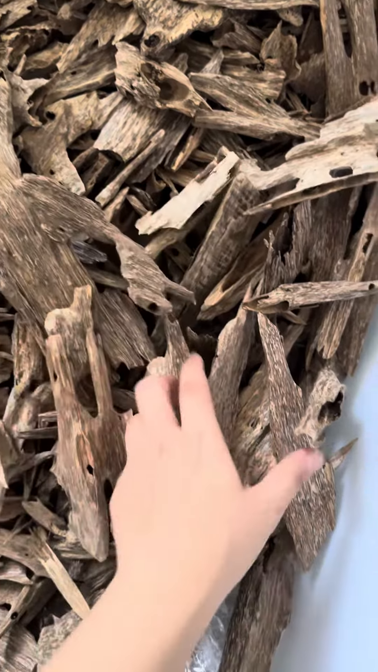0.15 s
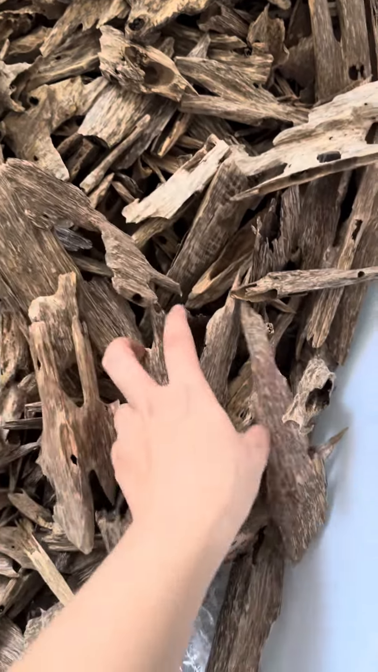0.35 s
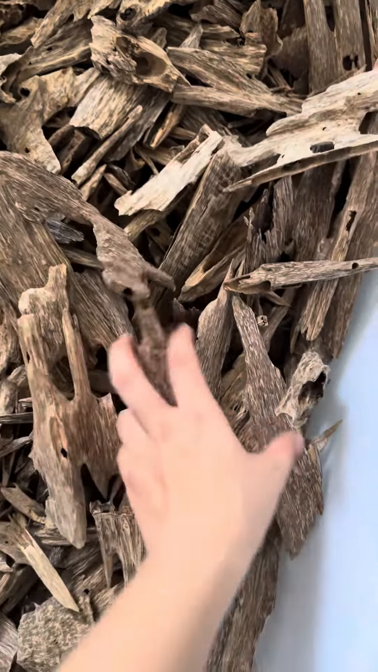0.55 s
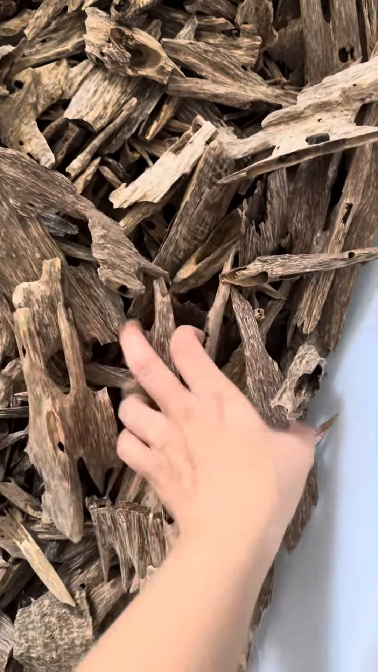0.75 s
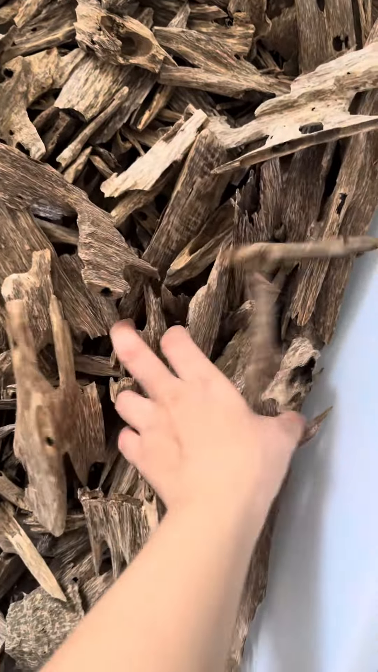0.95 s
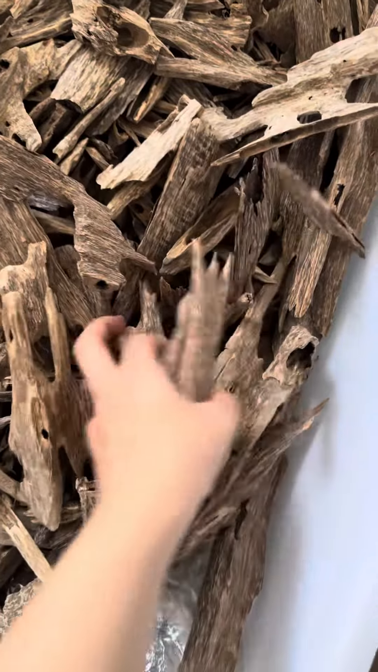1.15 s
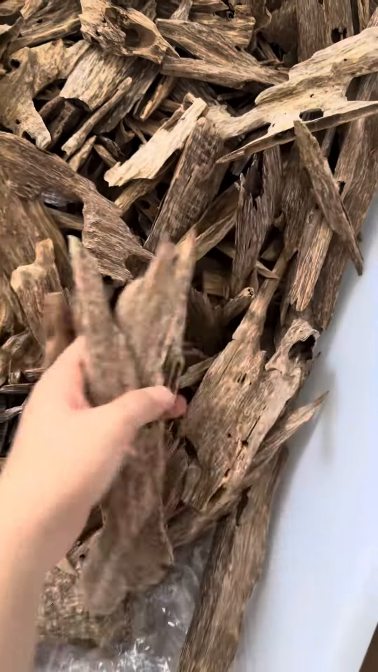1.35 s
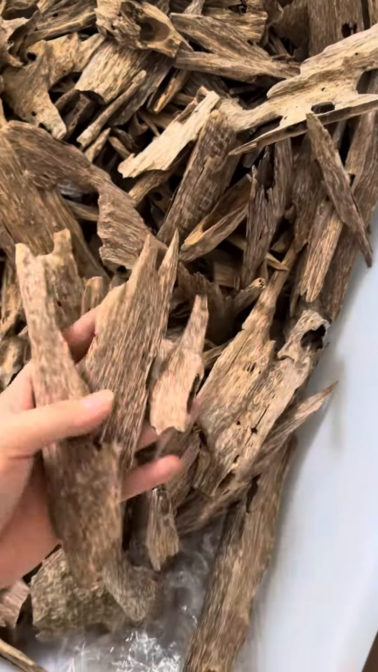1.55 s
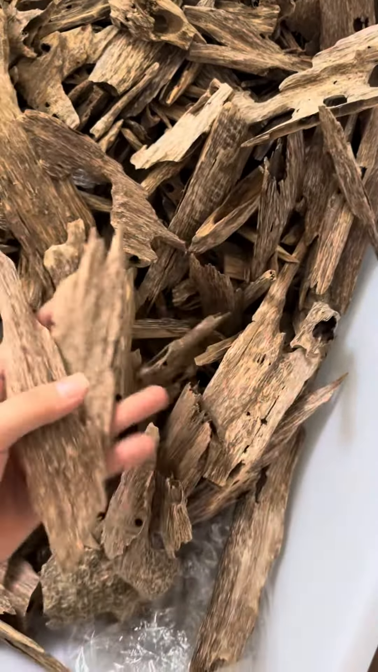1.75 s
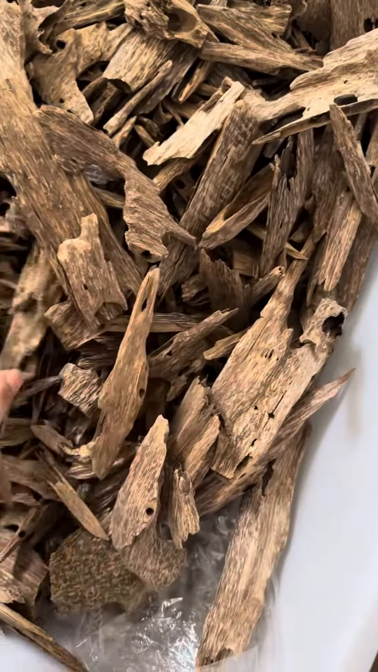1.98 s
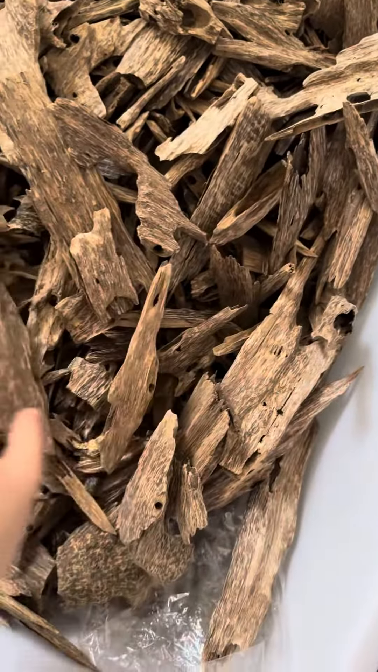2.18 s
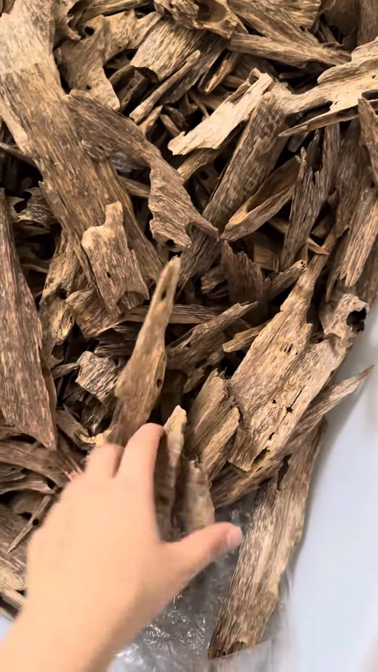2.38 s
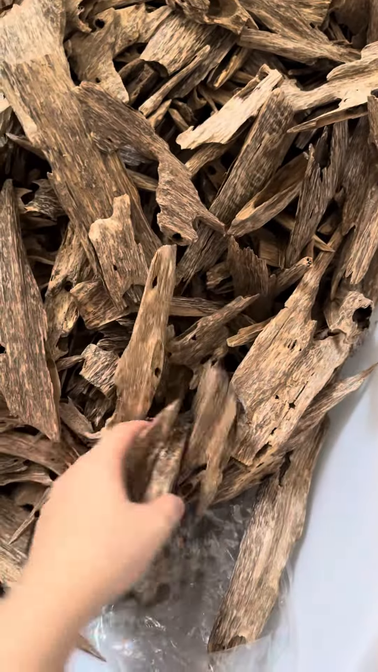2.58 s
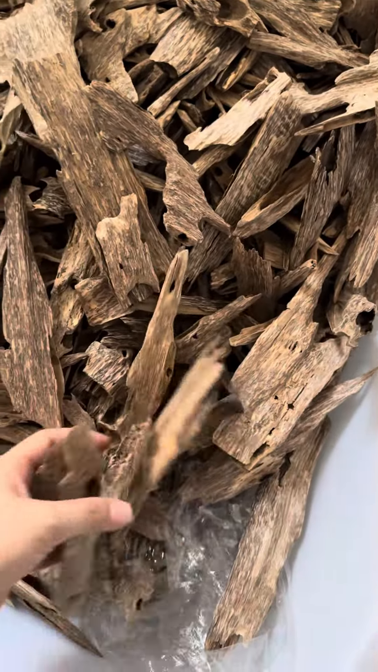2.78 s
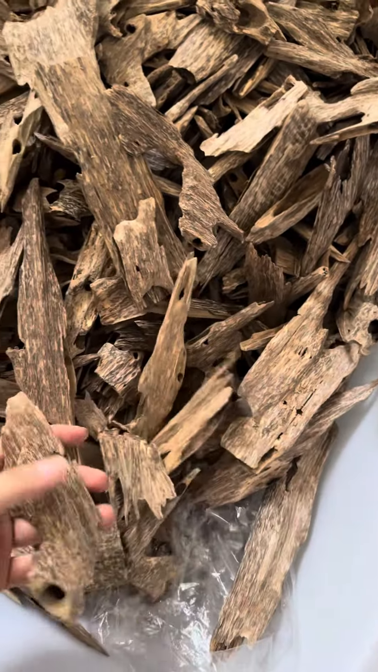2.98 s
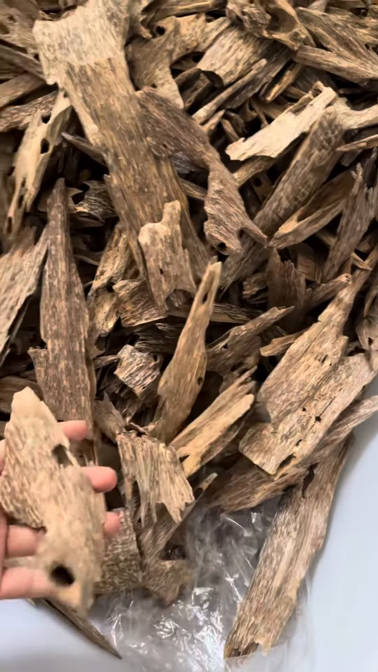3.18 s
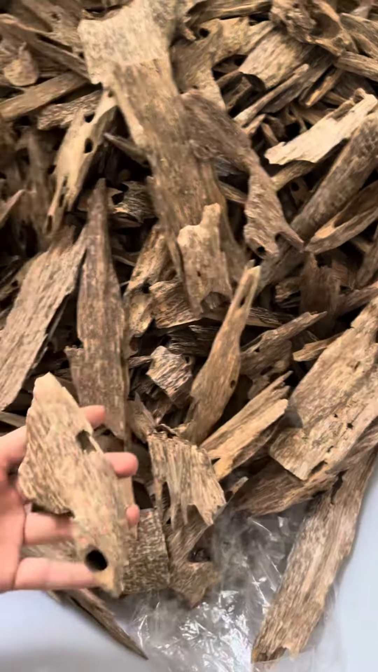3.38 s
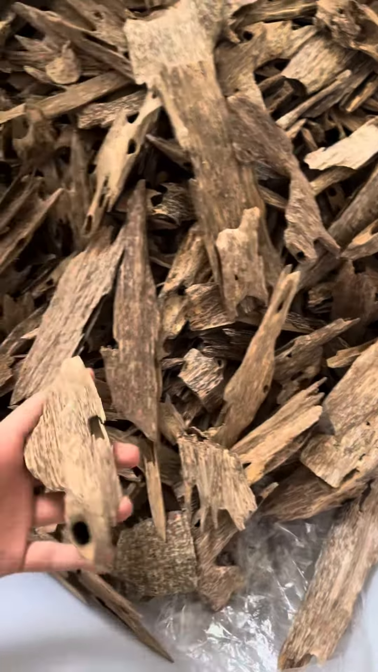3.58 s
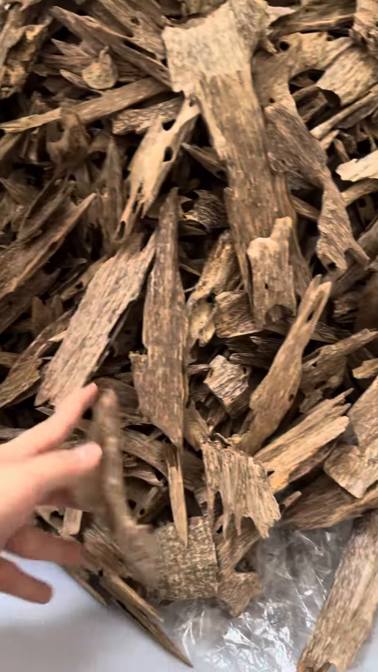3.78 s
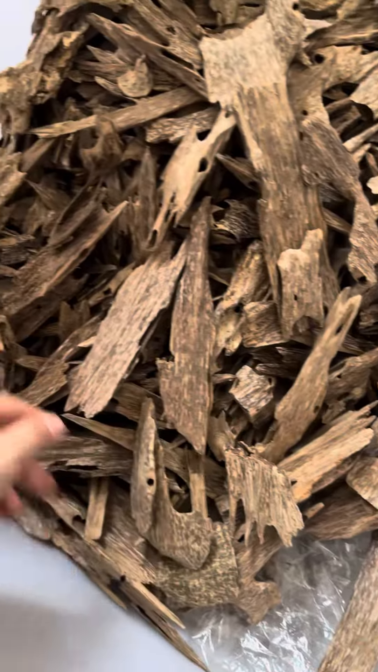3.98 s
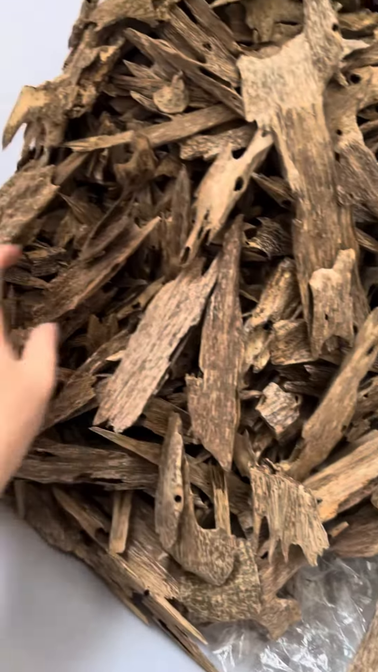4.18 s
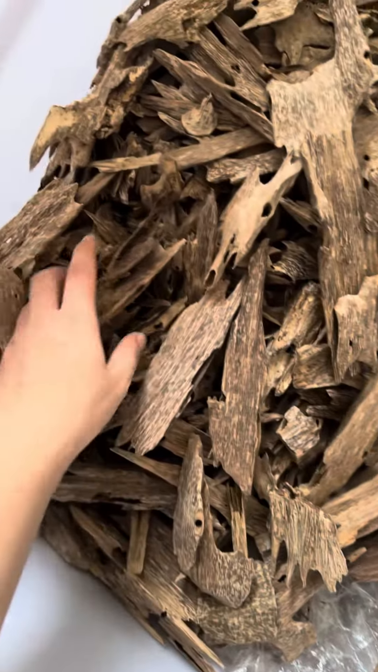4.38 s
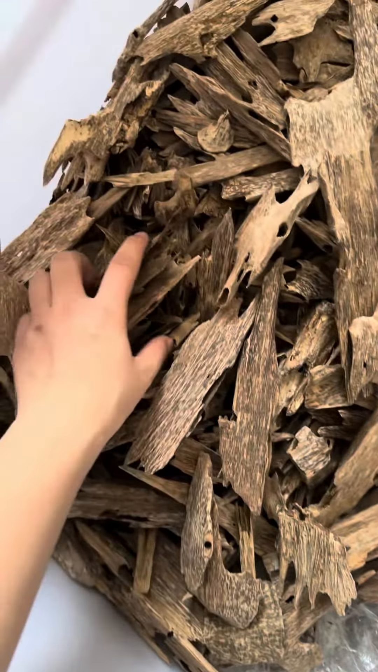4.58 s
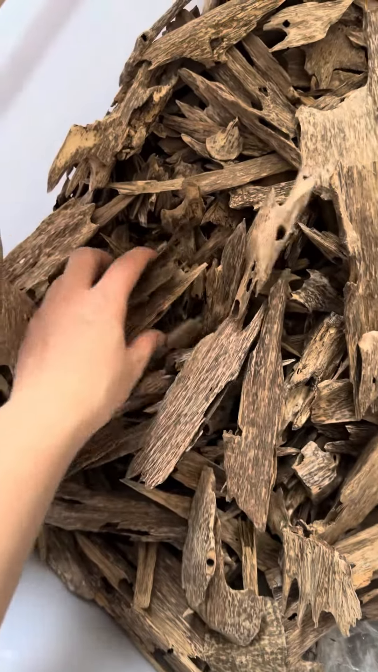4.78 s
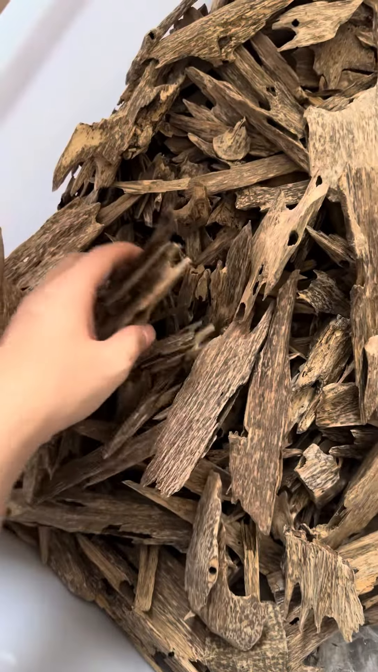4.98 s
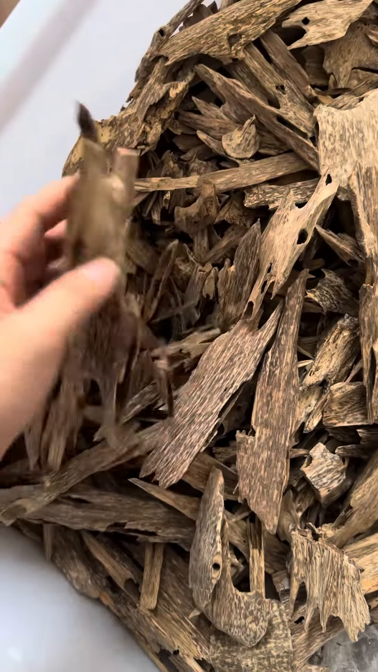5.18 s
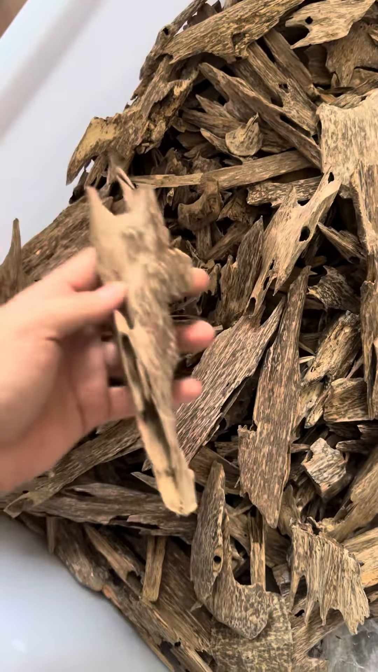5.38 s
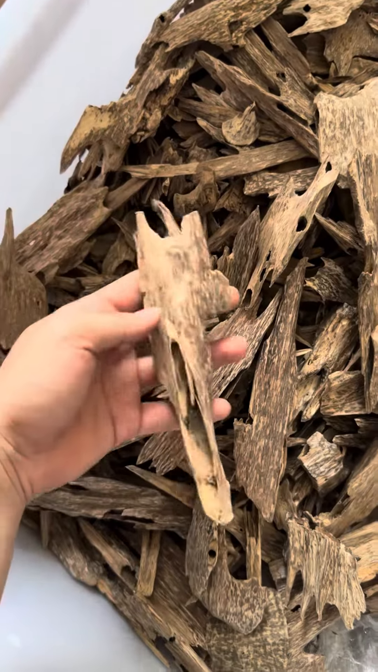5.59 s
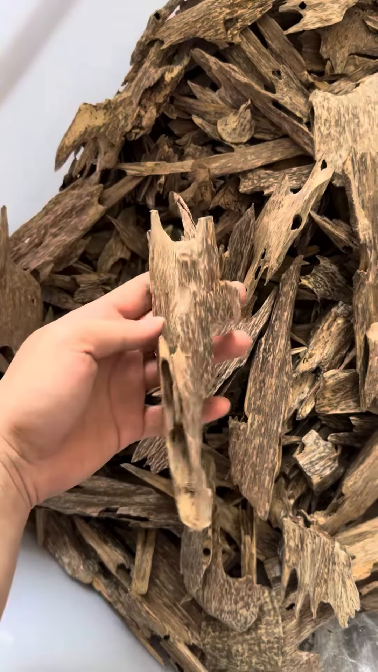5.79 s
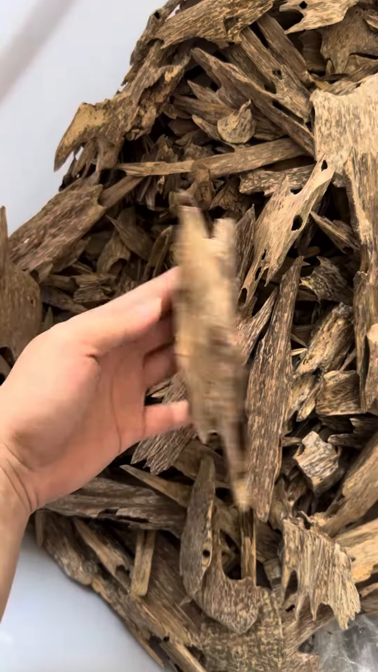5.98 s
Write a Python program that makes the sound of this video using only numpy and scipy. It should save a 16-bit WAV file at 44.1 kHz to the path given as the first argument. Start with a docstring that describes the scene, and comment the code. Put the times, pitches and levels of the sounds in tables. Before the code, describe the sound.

A quiet small room with a faint steady low drone, heard close on a phone. From 0 to 0.5 s a hand rustles dry wood chips with light ticks and scrapes. From 0.7 s the stirring swells into a dense clatter, loudest at 1.0-1.15 s, with bright hollow knocks, crackle, splintery hiss and dull plastic tub thuds. It thins by 1.5 s, then a crisp double clack at 1.66 s starts more rustling, with clustered knocks around 2.0 s and a crackling push from 2.3 to 2.9 s, including a strong clack at 2.78 s. A near-quiet gap follows until a few sharp knocks at 3.76-3.8 s. Small ticks come at 4.3 s, then a softer rummage from 4.6 to 5.4 s. Faint handling touches lead to a bright, hard wooden clack just after 6.0 s. Each knock is very short and dry, with a slight room tail.

```python
"""In a quiet room, a hand rummages through dry wooden chips in a plastic tub, close to a phone.
Chips knock and scrape on each other: short noisy pushes set off decaying tones of a few hundredths of a second.
As the heap shifts, random ticks and flickering bands of noise make it crackle and hiss.
The tub answers with dull thuds and a rumble, built from a few low decaying tones.
The room adds a short tail of decaying noise, over its own steady low drone."""
import sys
import numpy as np
from scipy import signal
from scipy.fft import rfft, irfft
from scipy.io import wavfile

SR = 44100
rng = np.random.default_rng(int(sys.argv[2]) if len(sys.argv) > 2 else 0)


def to_wav(sig):
    """Store sig (one row per channel, or 1-D mono) as 16-bit WAV at the path in sys.argv[1].

    Samples outside -1..1 are clipped; the rate is SR.
    """
    pcm = np.clip(np.atleast_2d(sig), -1, 1) * 32767
    pcm = np.round(pcm).astype(np.int16)
    wavfile.write(sys.argv[1], SR, pcm.T)  # frames by channels


N = 266805
TIME = np.arange(N) / SR  # seconds

# Strokes of the hand through the heap: start t/s, attack t/s, hold t/s, release t/s,
# effort level/dB, splinter hiss over the effort level/dB, tub rumble level/dB
HAND_STROKES = [(-0.03, 0.18, 0.27, 0.056, -48.5, -4.5, -47), (0.472, 0.055, 0.036, 0.083, -56.5, 0.5, -49),
                (0.59, 0.38, .3, .36, -40.5, -2.5, -40.5), (1.36, 0.055, 0.031, 0.14, -55, -4, -52),
                (1.637, 0.028, 0.09, 0.36, -46.5, -4, -49.5), (1.958, 0.072, 0.034, 0.34, -50, -2.5, -43),
                (2.323, 0.015, 0.56, 0.031, -42.5, -6.5, -41.5),
                (2.631, 0.054, 0.052, 0.061, -39.5, 0, -57), (3.582, 0.034, 0.31, 0.035, -64, -2.5, -54),
                (4.274, .01, 0.044, 0.12, -58.5, -4.5, -48.5), (4.392, 0.19, 0.032, 0.41, -56, 0.5, -47.5),
                (4.703, 0.049, 0.041, 0.089, -50.5, -4.5, -49.5),
                (4.845, .02, 0.18, 0.29, -48, -2.5, -46.5), (5.242, 0.089, 0.12, 0.046, -65.5, -1, -56),
                (5.635, 0.013, .02, 0.051, -67, 4, -56), (5.784, 0.024, 0.41, .05, -65, -1.5, -79)]
# Loudest blows of one chip on another: t/s, ring level/dB, ring pitch f/Hz, scrape setting t/ms (see contact),
# slab clack over the ring level/dB, snap over the ring level/dB; the parts are balanced again in blow
LOUD_KNOCKS = [(0.031, -50, 1740, 1.4, 2, 1), (0.0464, -35.5, 4400, 0.57, 1, -8),
               (0.0506, -39, 1850, 0.2, -0.5, 11), (0.0875, -43.5, 1650, 8.8, -0.5, -2.5),
               (0.151, -41.5, 4400, 17, -9, -3.5), (0.2723, -37.5, 4450, 0.66, -6, -1),
               (0.307, -35.5, 3100, 0.52, -6.5, -0.5), (0.3545, -52.5, 1940, 1.1, 11.5, -10),
               (0.437, -51.5, 1570, 0.72, 7, -1.5), (0.5835, -65.5, 1500, 5.9, 21, -18),
               (0.475, -49, 1520, 2.7, -5, -6), (0.7304, -35.5, 1784, 1.7, 2.5, -7.5),
               (0.8357, -35, 2360, 4, -2, -1.5), (0.8695, -26.5, 2560, 0.078, -9, -2),
               (0.9165, -27, 2700, 1.7, -13, -6), (0.9384, -24, 1740, 5.4, -9.5, -7),
               (0.9516, -29, 2710, 17.3, -6, -7), (1.0193, -12.5, 2776, 0.55, -17, -16.5),
               (1.048, -23, 1765, 1.5, -15, -1.5), (1.0573, -13, 2720, 0.5, -14, -19),
               (1.073, -30.5, 2710, 4, -2.5, -3), (1.0861, -25.5, 4220, 7.8, -7, -11),
               (1.0989, -17, 3115, .45, -8.5, -7), (1.135, -23.5, 3380, 1.9, -4, -9),
               (1.194, -37, 4180, 3.3, -20, -13), (1.2525, -39, 4220, 1.1, 0, 8.5),
               (1.2903, -29.5, 2022, 1.69, 1, -5), (1.3228, -29.5, 4470, 5.2, -15, -3.5),
               (1.367, -38.5, 2530, 4.2, -15, -11.5), (1.4376, -37.5, 2600, 5, -5, -3.5),
               (1.4785, -46, 4930, 0.34, -8, 6), (1.5938, -44.5, 4380, 1.6, 7.5, 3),
               (1.6592, -22, 2030, 0.55, -30, 0), (1.6627, -22.5, 2610, 0.69, -17, -12),
               (1.6931, -38.5, 1770, 0.56, 4, -2), (1.728, -37.5, 2270, 5.1, 2.5, -15),
               (1.8334, -31.5, 4130, 1.5, 1, -2.5), (1.8856, -44.5, 1730, 1.7, -4, -4.5),
               (1.9615, -31.5, 2790, 5.3, -5.5, -3.5), (1.9795, -38.5, 1750, 0.71, -8, 1),
               (1.9974, -28.5, 3300, 1, -4.5, -6), (2.0175, -33, 1840, 9.9, -1.5, 0.5),
               (2.0337, -26.5, 2740, 2.7, -9, -12), (2.0403, -28, 2900, 1.7, -22, 0.5),
               (2.068, -36.5, 2800, 6.1, 0, -13), (2.099, -38.5, 1750, 2.4, -24, -3),
               (2.1524, -37, 2720, .9, -7, -13.5), (2.2, -46, 2840, 12, -10, -7),
               (2.2483, -41, 1780, 1.4, -3.5, -1.5), (2.275, -50.5, 1780, 0.72, -2.5, 4),
               (2.3194, -38.5, 1990, 0.23, -26, -12), (2.4431, -36, 1970, 0.29, -20, -1.5),
               (2.513, -28, 2920, .7, -11, -7.5), (2.5695, -42, 2350, 1.24, 11, 5.5),
               (2.5898, -34, 1990, 0.76, -15, -16.5), (2.632, -43, 3220, 0.99, 6.5, -12),
               (2.6911, -28, 2520, 1, -8.5, -8.5), (2.749, -33.5, 2480, 2.7, -16, -16),
               (2.7759, -20, 1987, 2, -19, -8.5), (2.8678, -37.5, 1950, .3, 0.5, 2.5),
               (2.888, -42.5, 2260, 1.8, 6, -8.5), (3.594, -54, 2440, 0.58, -5.5, -3),
               (3.6253, -52, 3150, .5, -1, -2.5), (3.7627, -25.5, 2870, 0.26, -2.5, -5),
               (3.7728, -27.5, 2920, 4.9, -2, -2), (3.792, -28, 1725, 0.98, -7, -7),
               (3.8711, -39, 1780, 0.94, 2.5, -11.5), (3.9091, -51.5, 1758, 1.5, 6, -9.5),
               (4.2894, -48.5, 2115, 5.4, 0, 3.5), (4.319, -51, 2325, 1.7, -6.5, -17),
               (4.3469, -54, 2400, 0.89, -7.5, -17.5), (4.653, -33, 1730, 2.6, -10, -3.5),
               (4.714, -34, 2010, 0.33, -11.5, -6), (4.794, -39.5, 1750, .1, -25, -24),
               (4.8456, -41, 2230, 0.37, -25, -2), (4.9188, -40.5, 2460, 1.3, -19, -3),
               (4.9302, -44, 2550, 4.9, -20, 1), (4.9982, -44, 2100, 2.9, -7, -2),
               (5.05, -38, 2560, 3.5, -1, -15.5), (5.0592, -34, 1736, 1.1, -13, 3),
               (5.1252, -36, 2560, .25, -3, -1), (5.1545, -38, 3500, .7, -8, 2),
               (5.2202, -42.5, 3420, .4, -6.5, 3), (5.268, -52, 2410, 1.04, -11, -4),
               (5.3063, -45, 4280, 0.34, -12, -3), (5.3713, -50, 1836, 0.97, 1, 0.5),
               (5.6507, -60.5, 2720, 1.7, -9, 4.5), (5.834, -51.5, 2520, 1.3, -30, -2),
               (5.8866, -48, 2490, 0.67, -29, -2.5), (5.9164, -42.5, 2690, 0.63, -32, -1),
               (6.026, -21, 6030, 2.3, -22, -20), (6.03, -16, 2610, 0.31, -18, -7.5),
               (6.0462, -22, 2320, .4, -18, -3)]
# The heap drops and bumps the tub; hard corners favour its higher modes: t/s, level/dB, tilt/dB per octave
TUB_BUMPS = [(0.0523, -35.5, 0), (0.308, -36.5, 0.5), (0.3528, -43, -4), (0.437, -39.5, 0),
             (0.5863, -33, 2.5), (0.87, -34, 0.5), (0.9514, -24, -4.5), (1.0976, -31, -1), (1.135, -29, 1),
             (1.6828, -40, 7), (2.0396, -40.5, -7), (2.401, -41.5, 8), (2.5897, -39.5, 15),
             (2.8689, -37, 7), (3.7636, -31.5, 7), (3.7938, -32.5, 3), (5.059, -37, 0.5)]

# Ringing tones, before random changes of pitch and strength; t60 is the time to fade by 60 dB.
# Bending of a chip: multiple of its ring pitch, level/dB, t60 t/s
CHIP_TONES = [(1, -1.5, 0.023), (.74, -22, 0.074), (1.18, -9.5, 0.011), (1.55, -12.5, 0.012)]
# Larger slabs and the hollows between them, before a small shift down: f/Hz, level/dB, t60 t/s
SLAB_TONES = [(772, -20.5, 0.062), (941.6, -6, .05), (1088, -6.5, .05), (1136, -4.5, 0.052)]
# The loaded tub, before the thud's small shift down: f/Hz, level/dB, t60 t/s
TUB_TONES = [(79.9, -7.5, 0.29), (123.7, -2.5, 0.24), (160.4, 2.5, 0.09), (183.5, 0, 0.099),
             (263, -6.5, 0.12), (305, -6, 0.053), (397, -3.5, 0.036)]

# Colours, as relative strength along the pitch range; each sound is levelled later.
# Shifting heap: f/Hz, level/dB
CRACKLE_COLOUR = [(200, 9), (400, 1), (650, 4), (1050, 1.5), (1400, 4.5), (1900, -1.5), (2700, 2.5),
                  (4200, -10.5), (6000, -25.5)]
# Rubbing splinters: f/Hz, level/dB
HISS_COLOUR = [(2500, -26.5), (4500, -4), (6800, -3.5), (9000, -0.5), (12000, -21.5), (15500, -6.5)]
# Quiet room: f/Hz, level/dB
DRONE_COLOUR = [(15, -45.5), (25, -3.5), (86, -5), (118, -16), (197, -18), (225, -23.5), (367, -28),
                (418, -27), (463, -34.5), (569, -31), (817, -34.5), (1370, -40), (1600, -39),
                (12000, -69.5), (15600, -110), (22000, -120)]
# Slabs under a blow: f/Hz, level/dB
CLACK_COLOUR = [(300, -35.5), (550, -9.5), (800, -7.5), (1030, -7.5), (1300, -9.5), (1800, -17)]
# Wood at the touching spot: f/Hz, level/dB
CRACK_COLOUR = [(900, -30), (1500, -5), (2000, 1.5), (2900, 1), (4300, -1.5), (6000, -22)]
# Snapping fibres: f/Hz, level/dB
SNAP_COLOUR = [(3000, -9.5), (4700, -6.5), (6200, -3.5), (8000, -4.5), (11000, -12), (15500, -15.5)]
# Lead of the left microphone port over the right: f/Hz, phase/radians
PORT_LEAD = [(0, 0), (200, .1), (550, .35), (900, .08), (1500, 0), (2200, .1), (2800, .6), (3700, .3),
             (5000, .4), (6100, -.6), (8000, -2), (10300, -2.95), (13500, -3.2), (15500, -4)]

RELEASE_CURVE = 1.66  # power of the release: the heap settles quickly, then trails off
RUMBLE_CURVE = 0.38  # power of a stroke's shape in the rumble: the tub answers even a gentle push
# The heap goes on trickling after a stroke: level under the stroke (dB), decay (s)
SETTLE_DB, SETTLE_T60_S = -22.5, 0.3
# Pieces catch and give way, so every stroke is uneven: typical wobble (dB), new levels per second
CATCH_DB, CATCH_PER_S = 0.83, 35
DRONE_DB = -48.5  # overall level of the room's own noise
# Lesser blows: middle level over the effort and scatter either way (dB), pitch range (Hz), largest scrape (ms)
JOSTLE_DB, JOSTLE_SPREAD_DB = 0.5, 7.5
JOSTLE_LOW_HZ, JOSTLE_HIGH_HZ, JOSTLE_SCRAPE_MS = 1610, 3000, 2.2
# Every blow reaches the tub through the heap, which cushions the hard ones:
# a middling blow (dB), its thud (dB), dB of thud per dB of blow
MIDDLING_BLOW_DB, THUD_DB, THUD_SLOPE = -37, -52, 0.28
TOP_HZ = 15900  # the phone passes nothing much above this


def undb(db):
    """Turn decibels into gain: every 20 dB is a factor of ten."""
    return 10 ** (np.asarray(db) / 20)


def rms(x):
    """Measure average strength: the root of the mean square."""
    return np.sqrt(np.mean(x ** 2) + 1e-20)


def add(track, start, sound):
    """Mix a sound in from the given second on."""
    i = max(int(start * SR), 0)
    track[i:i + len(sound)] += sound[:max(N - i, 0)]


def convolve(x, response):
    """Let every sample of a sound set off the response, keeping the length."""
    return signal.fftconvolve(x, response)[:len(x)]


def response(points, size=512):
    """Build a filter with the colour of (Hz, dB) points that reacts only after it is struck."""
    hz, db = np.transpose(points)
    octave = np.log2(np.maximum(np.arange(size // 2 + 1), .5) * SR / size)
    # beyond the end points the colour falls by 20 dB per octave
    outside = np.abs(octave - np.clip(octave, np.log2(hz[0]), np.log2(hz[-1])))
    level_db = np.interp(octave, np.log2(hz), db) - 20 * outside
    # folding the cepstrum (spectrum of the log spectrum) puts the energy as early as possible
    cepstrum = irfft(np.log(undb(level_db)))
    cepstrum[1:size // 2] *= 2
    cepstrum[size // 2 + 1:] = 0
    return irfft(np.exp(rfft(cepstrum)))


def fade(t, t60):
    """Decay smoothly, falling by 60 dB in t60 seconds."""
    return np.exp(-np.log(1000) * t / t60)


def ring(modes, scale, detune, size=4096):
    """Add decaying tones; pitch and strength depend on the piece and the spot that is hit."""
    t = TIME[:size]
    hz, db, t60 = np.transpose(modes)[:, :, None]
    pitch, spot, side = rng.standard_normal((3, len(modes), 1))
    # a multiple of exactly 1 is the main tone and stays in tune
    hz = hz * scale * (1 + detune * pitch * (hz != 1))
    strength = np.sign(side) * undb(db + 3.1 * spot)
    return np.sum(strength * fade(t, t60) * np.sin(2 * np.pi * hz * t), axis=0)


def attack_level(x, db, size=441):
    """Set the average strength of the start, a hundredth of a second unless size says otherwise."""
    return x * undb(db) / rms(x[:size])


def walk(rate):
    """Drift at random, finding a new value rate times a second."""
    return np.interp(TIME * rate, np.arange(4096), rng.standard_normal(4096))


def hand_effort():
    """Set crackle, hiss and rumble gains: each stroke of the hand swells, holds, dies away and settles."""
    power = np.zeros((3, N))
    for start, attack, hold, release, db, hiss_db, rumble_db in HAND_STROKES:
        length = attack + hold + release
        span = slice(max(int(start * SR), 0), int((start + length + SETTLE_T60_S) * SR))
        t = TIME[span] - start
        swell = np.clip(t / attack, 0, 1)
        push = np.clip((length - t) / release, 0, 1) ** RELEASE_CURVE
        trickle = undb(SETTLE_DB) * fade(np.maximum(t - length, 0), SETTLE_T60_S)
        shape = swell * np.maximum(push, trickle)
        crackle = undb(db) * shape
        hiss = undb(db + hiss_db) * shape
        rumble = undb(rumble_db) * shape ** RUMBLE_CURVE
        # overlapping strokes add as power
        power[:, span] += np.square([crackle, hiss, rumble])
    return np.sqrt(power) * undb(CATCH_DB * walk(CATCH_PER_S))


def stirring(crackle_gain, hiss_gain, rumble_gain):
    """Shift the heap: chips and splinters tick, rough faces rub and hiss, and the tub rumbles."""
    chips = ticking(low_hz=1578, high_hz=3420, spread_db=14, count=900)
    slabs = ticking(low_hz=420, high_hz=1300, spread_db=15.5, count=300)
    splinters = ticking(low_hz=3900, high_hz=7900, spread_db=15.5, count=800)
    friction = rubbing(catch_db=3, flicker_db=4.2)
    crackle = convolve(friction, response(CRACKLE_COLOUR))
    hiss = convolve(friction, response(HISS_COLOUR))
    rumble = tub_rumble()
    crackling = undb(-3.5) * chips + undb(-2.5) * crackle / rms(crackle) + undb(-11.5) * slabs
    hissing = undb(1.0) * hiss / rms(hiss) + undb(-2.0) * splinters
    return crackle_gain * crackling + hiss_gain * hissing + rumble_gain * rumble / rms(rumble)


def ticking(low_hz, high_hz, spread_db, count):
    """Let small pieces touch at random moments, each with its own pitch; most touches are weak."""
    out = np.zeros(N)
    for when, pitch, strength in rng.random((count, 3)):
        hz = low_hz * (high_hz / low_hz) ** pitch
        tick = ring(CHIP_TONES, hz, detune=0.027, size=1024)
        add(out, when * N / SR, tick * undb(spread_db * strength ** 3))
    return out / rms(out)


def rubbing(catch_db, flicker_db, count=25):
    """Rough faces catch and let go; as the touching spot moves, each resonance swells on its own."""
    edges = np.geomspace(250, 16000, count)  # Hz
    out = np.zeros(N)
    for band in zip(edges, edges[1:]):
        resonance = signal.butter(2, band, "band", fs=SR, output="sos")
        noise = signal.sosfilt(resonance, rng.standard_normal(N))
        out += noise * undb(flicker_db * walk(rate=90))
    # slow and fast unevenness shared by all bands
    catching = walk(rate=41) + .7 * walk(rate=180)
    return out * undb(catch_db * catching)


def tub_rumble():
    """Set the tub's low tones off with many tiny slips, in four differently tuned layers."""
    out = np.zeros(N)
    for _ in range(4):
        tub = ring(TUB_TONES, 1, detune=.06, size=8192)
        out += convolve(slips(rate=100, spread_db=3), tub)
    return out


def slips(rate, spread_db):
    """Scatter tiny slips at random, about rate a second, most of them weak and a few strong."""
    chance = rng.random(N)
    strength = np.minimum(rng.exponential(size=N), 3.5)
    return (chance < rate / SR) * undb(spread_db * strength) * rng.choice([-1, 1], N)


def drone():
    """Colour random noise into the steady low noise of the room."""
    # the extra samples at the start are dropped, so the filter is already full
    noise = convolve(rng.standard_normal(N + 8192), response(DRONE_COLOUR, size=8192))[-N:]
    return noise * undb(DRONE_DB) / rms(noise)


def knocks(effort, count=90):
    """Strike the loud blows, and lesser ones at random as strong as the hand's effort."""
    out = np.zeros(N)
    colours = response(CLACK_COLOUR), response(CRACK_COLOUR), response(SNAP_COLOUR)
    for s, db, hz, scrape_ms, clack_db, snap_db in LOUD_KNOCKS:
        add(out, s, blow(db, hz, scrape_ms, clack_db, snap_db, colours))
    # one lesser blow at a random moment of each equal slot of time
    for slot, (when, pitch, strength, scrape) in enumerate(rng.random((count, 4))):
        i = int((slot + when) / count * N)
        effort_db = 20 * np.log10(effort[i] + 1e-9)
        db = effort_db + JOSTLE_DB + JOSTLE_SPREAD_DB * (2 * strength - 1)
        hz = JOSTLE_LOW_HZ * (JOSTLE_HIGH_HZ / JOSTLE_LOW_HZ) ** pitch
        scrape_ms = JOSTLE_SCRAPE_MS * scrape
        add(out, i / SR, blow(db, hz, scrape_ms, clack_db=-5, snap_db=-8.5, colours=colours))
    return out


def blow(db, hz, scrape_ms, clack_db, snap_db, colours):
    """One blow rings a chip, snaps its fibres, sounds the slabs beneath and thuds on the tub."""
    clack_colour, crack_colour, snap_colour = colours
    # hard blows stand further above the rattle of their neighbours than soft ones
    rattle_db = -3.5 - 0.053 * (db + 38)
    force = contact(scrape_ms, rattle_db, rattle_t60_s=0.052)
    chip = ring(CHIP_TONES, hz, detune=0.063)
    # the impact sets the chip ringing and the scrape keeps it going
    impact = chip * (1 - fade(TIME[:len(chip)], .004))
    tone = attack_level(impact, -4) + attack_level(convolve(force, chip), -5)
    crack = attack_level(convolve(force, crack_colour), -4.5)
    # the snap's scrape is slightly longer, and its rattle a little weaker
    snap_force = contact(scrape_ms * 1.2, rattle_db - 1, rattle_t60_s=0.054)
    snap = attack_level(convolve(snap_force, snap_colour), snap_db - .5)
    clack = undb(clack_db) * slab_clack(scrape_ms, clack_colour)
    wood = tone + crack + snap + clack
    return undb(db) * wood + thud(THUD_DB + THUD_SLOPE * (db - MIDDLING_BLOW_DB))


def contact(scrape_ms, rattle_db, rattle_t60_s, size=4096):
    """Force of a blow: a scrape over rough grain swells and stops, then neighbouring chips rattle."""
    t = TIME[:size]
    rough, rattle = rng.standard_normal((2, size))
    # even the shortest scrape takes a moment
    scrape_span_ms = 1.23 * max(scrape_ms, 0) + 1.7
    progress = t / scrape_span_ms * 10 ** 3
    scrape = np.sign(rough) * np.sqrt(progress) * np.exp(-progress ** 2)
    rattle = rattle * fade(t, rattle_t60_s) * np.minimum(progress, 1)
    return scrape / rms(scrape) + undb(rattle_db) * rattle / rms(rattle)


def slab_clack(scrape_ms, colour):
    """A push sounds the larger slabs and the hollows between them."""
    push = convolve(contact(scrape_ms, rattle_db=-7.0, rattle_t60_s=0.086), colour)
    slabs = convolve(push, ring(SLAB_TONES, 0.98, detune=0.076))
    return attack_level(push, -4.0) + attack_level(slabs, -7)


def thud(db, tilt_db=0):
    """Sound the dull answer of the loaded tub, tilted by so many dB an octave."""
    modes = [(hz, level + tilt_db * np.log2(hz), t60) for hz, level, t60 in TUB_TONES]
    return attack_level(ring(modes, 0.98, detune=0.08), db, size=882)


def bumps():
    """Drop the heap against the tub, which thuds."""
    out = np.zeros(N)
    for s, db, tilt_db in TUB_BUMPS:
        add(out, s, thud(db, tilt_db))
    return out


def ports(x):
    """Hear through two microphone ports: alike in the deep bass, near opposite phase in the high treble."""
    phase = np.interp(np.arange(N + 1) * SR / (2 * N), *np.transpose(PORT_LEAD))
    # each port takes half of the lead, one forward and one back
    turn = np.exp(.5j * np.outer([1, -1], phase))
    return irfft(rfft(x, 2 * N) * turn)[:, :N]


def echoes(x, wet_db, t60_s, low_hz, high_hz, size=16384):
    """Blur the sound with decaying noise, like many small reflections, different at each port."""
    t = TIME[:size]
    band = signal.butter(2, [low_hz, min(high_hz, .45 * SR)], "band", fs=SR, output="sos")
    tails = signal.sosfilt(band, rng.standard_normal((2, size))) * fade(t, t60_s)
    return np.array([convolve(x, tail * undb(wet_db) / np.sqrt(np.sum(tail ** 2))) for tail in tails])


def scene():
    """Chips and tub near the phone; the heap scatters the treble, the tub walls the bass, the room adds a tail."""
    effort, hiss_gain, rumble_gain = hand_effort()
    heap = stirring(effort, hiss_gain, rumble_gain) + knocks(effort) + bumps()
    near = heap + drone()
    scatter = echoes(heap, wet_db=-15, t60_s=.025, low_hz=2400, high_hz=9000)
    tub_walls = echoes(near, wet_db=-31, t60_s=.05, low_hz=230, high_hz=560)
    room = echoes(heap, wet_db=-24.0, t60_s=0.27, low_hz=220.4, high_hz=5000)
    return ports(near) + scatter + tub_walls + room


def record(dry):
    """The phone cuts the deep bass, clips at full scale and cuts the top."""
    bass_cut = signal.butter(4, 44, "high", fs=SR, output="sos")
    top_cut = signal.ellip(8, .2, 70, TOP_HZ, fs=SR, output="sos")
    thin = signal.sosfilt(bass_cut, dry)
    return signal.sosfilt(top_cut, np.clip(thin, -1, 1))


dry = scene()
out = record(dry)
to_wav(out)
```